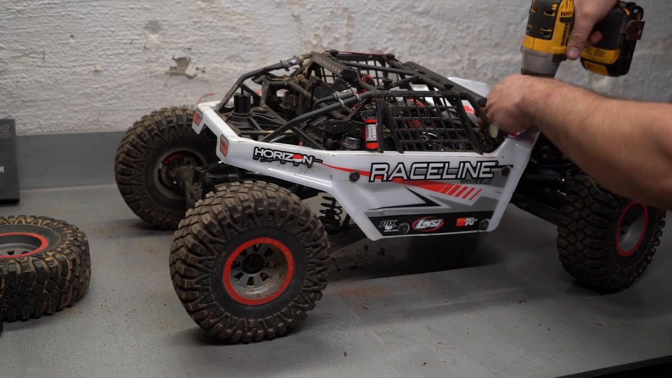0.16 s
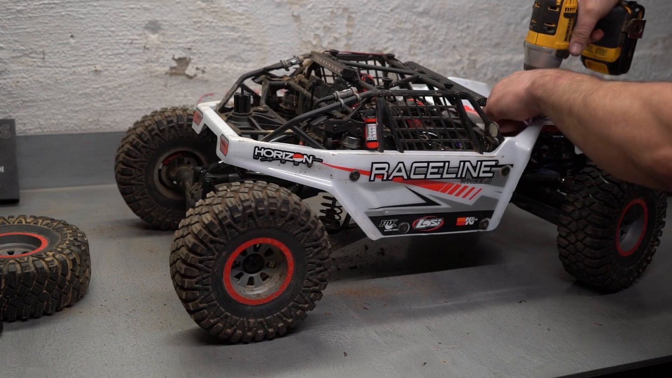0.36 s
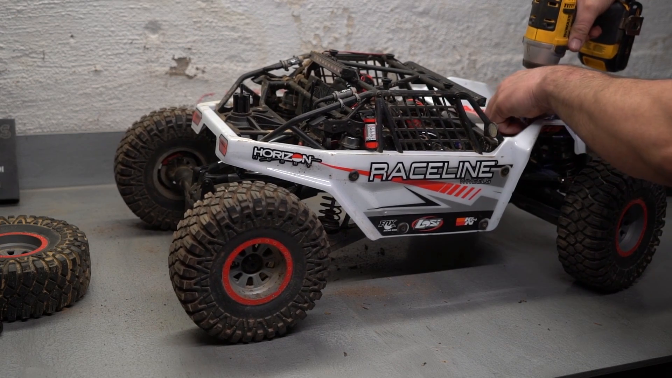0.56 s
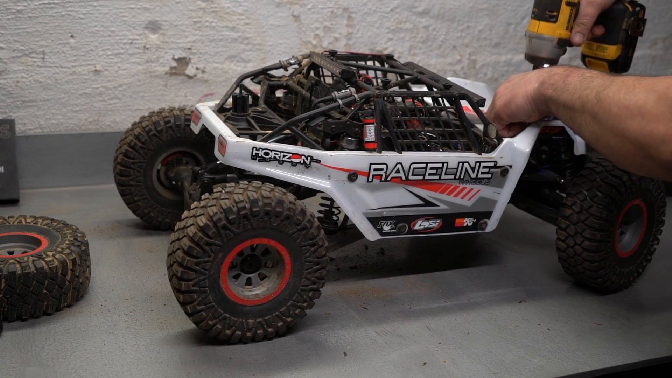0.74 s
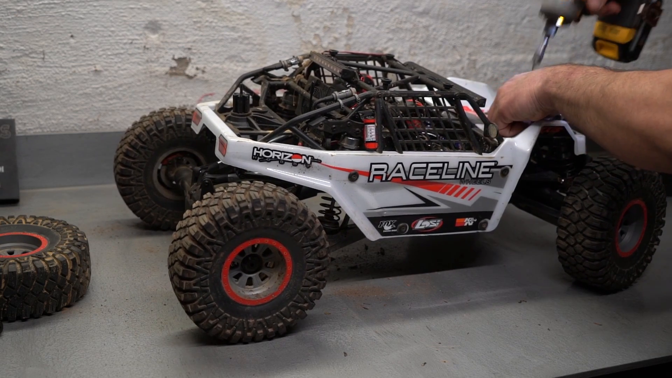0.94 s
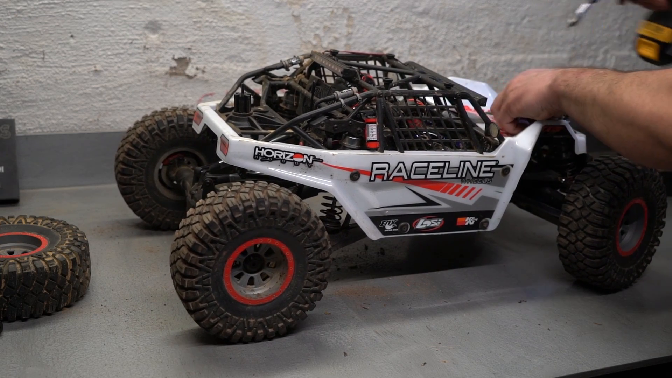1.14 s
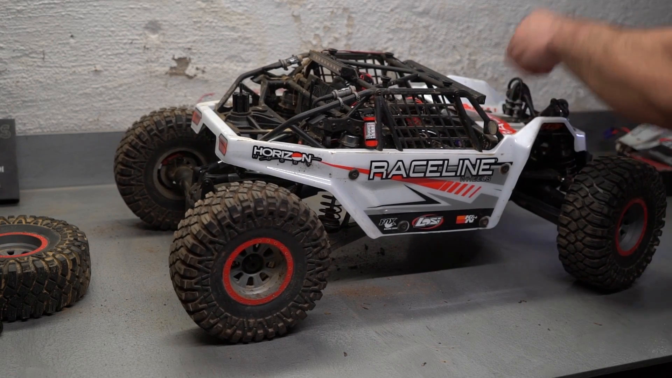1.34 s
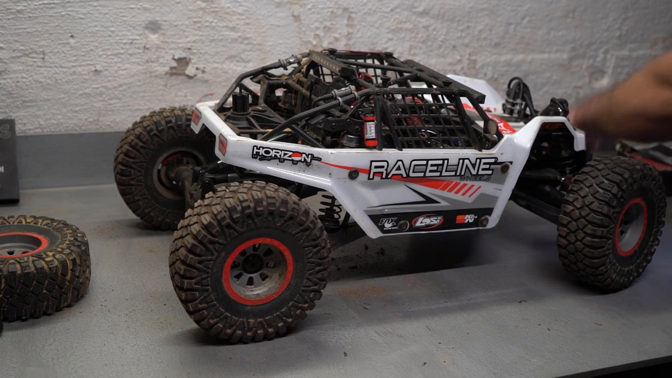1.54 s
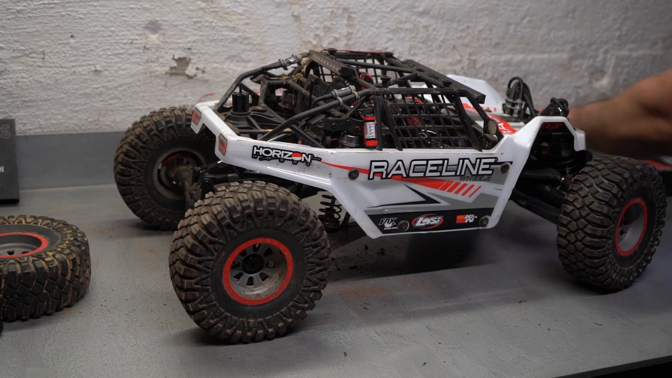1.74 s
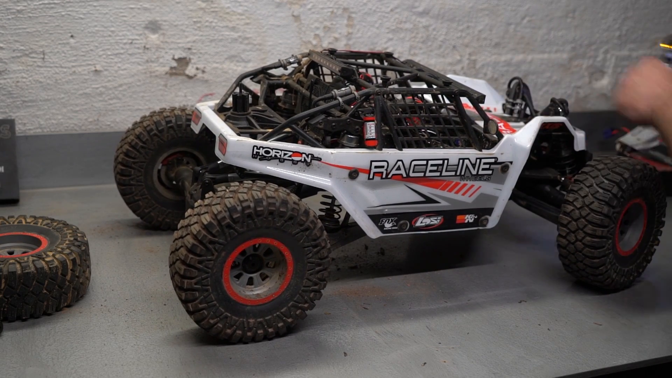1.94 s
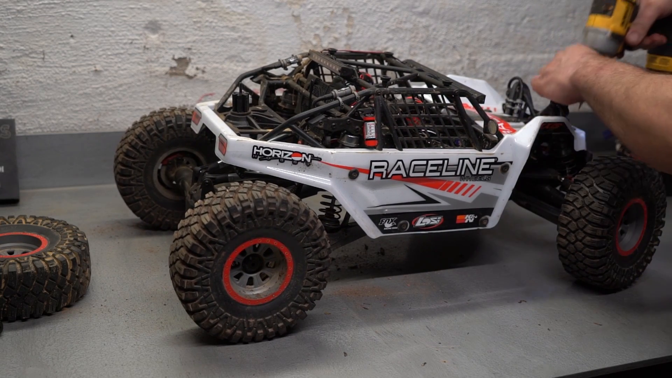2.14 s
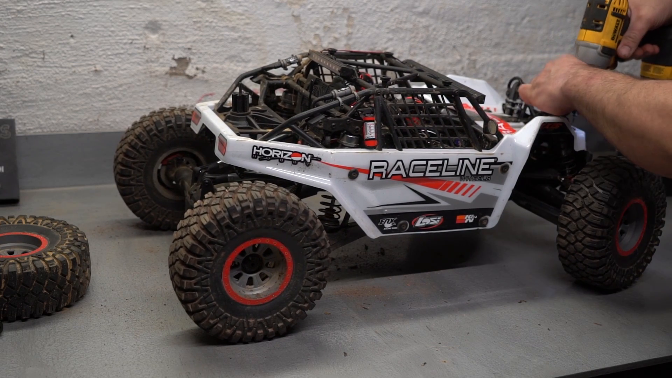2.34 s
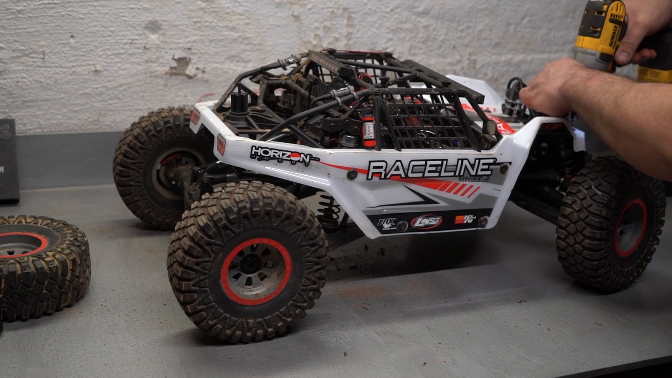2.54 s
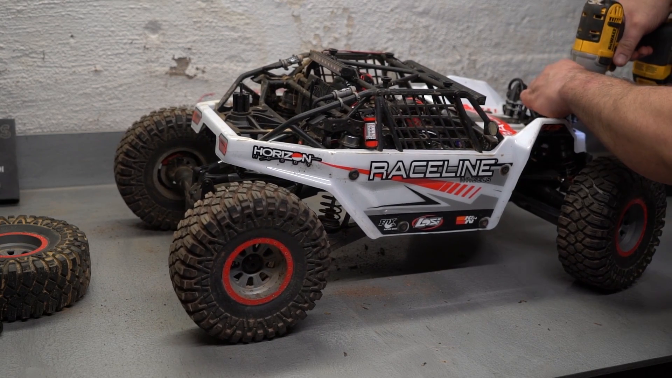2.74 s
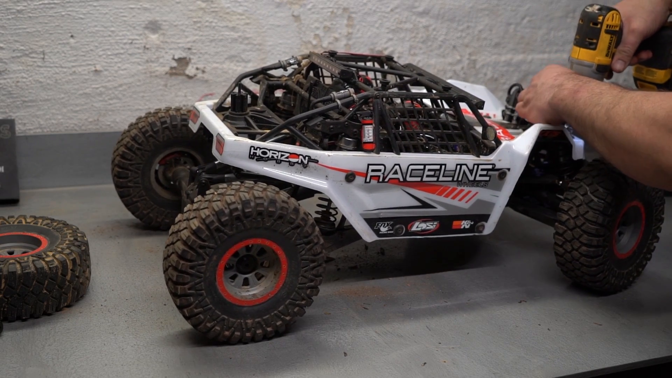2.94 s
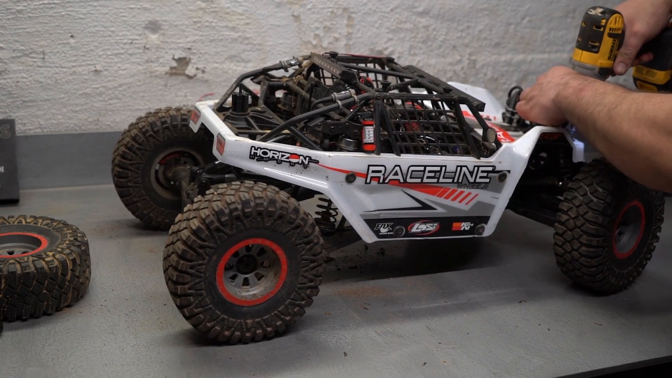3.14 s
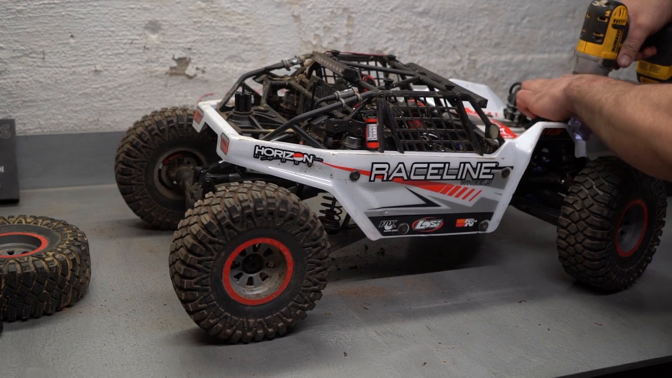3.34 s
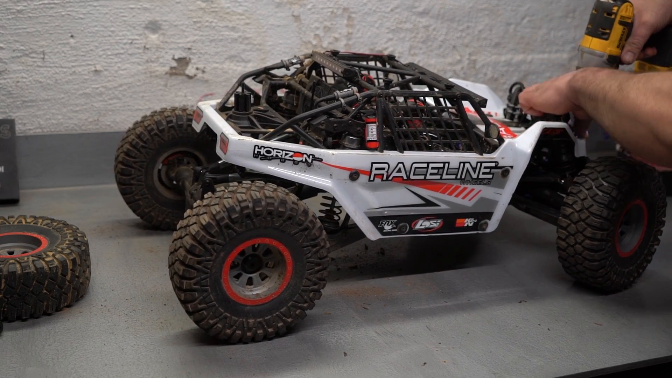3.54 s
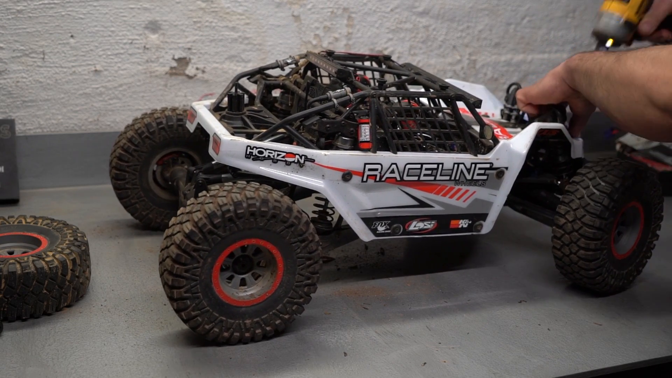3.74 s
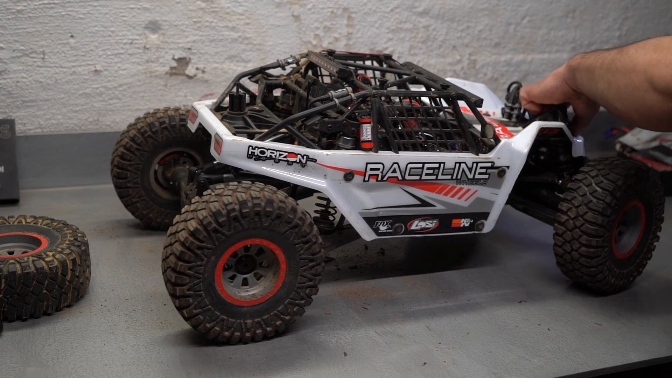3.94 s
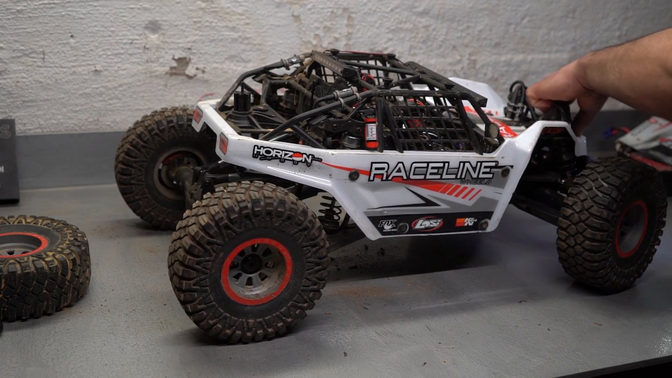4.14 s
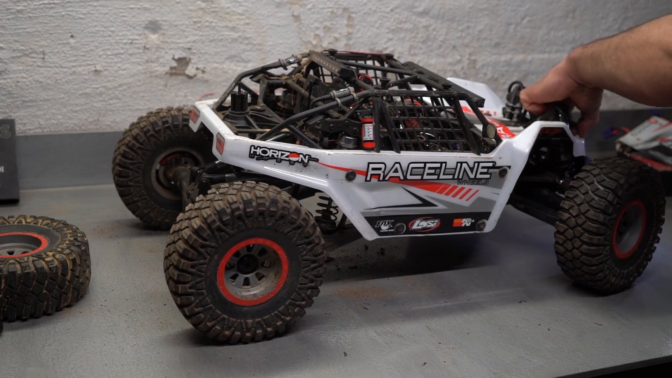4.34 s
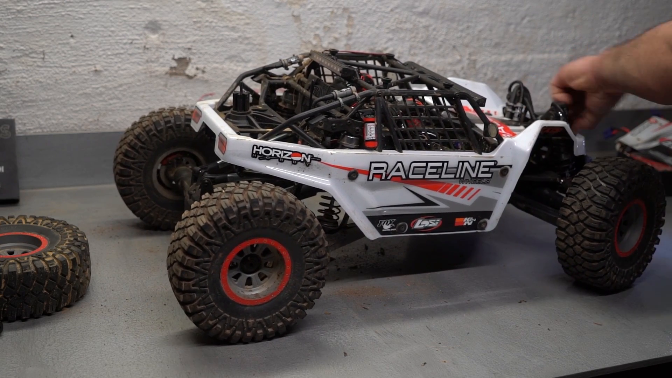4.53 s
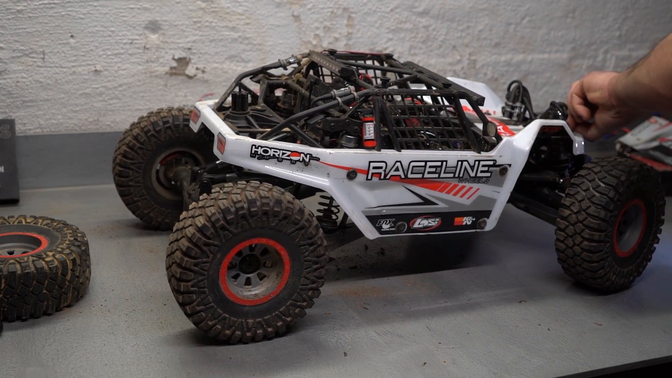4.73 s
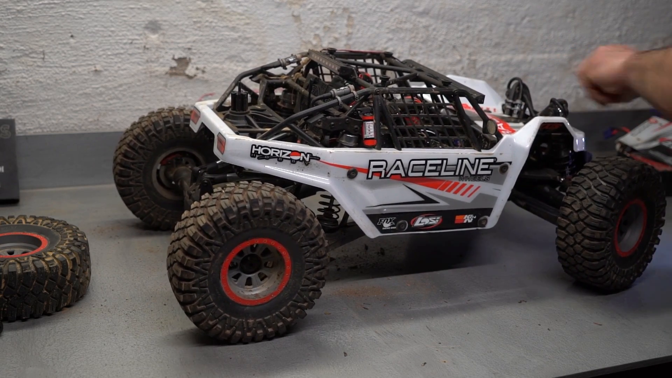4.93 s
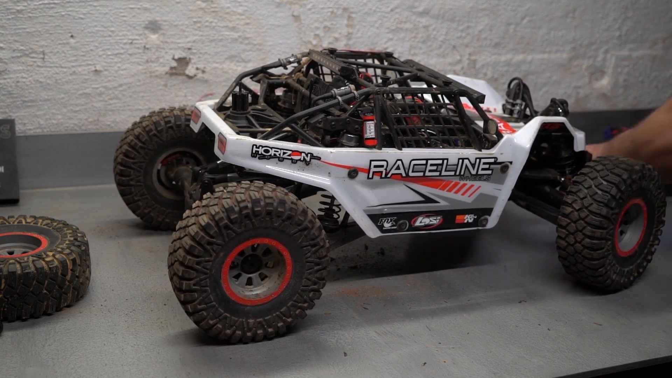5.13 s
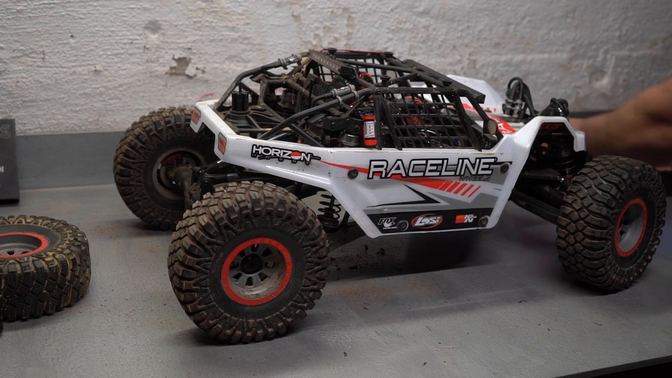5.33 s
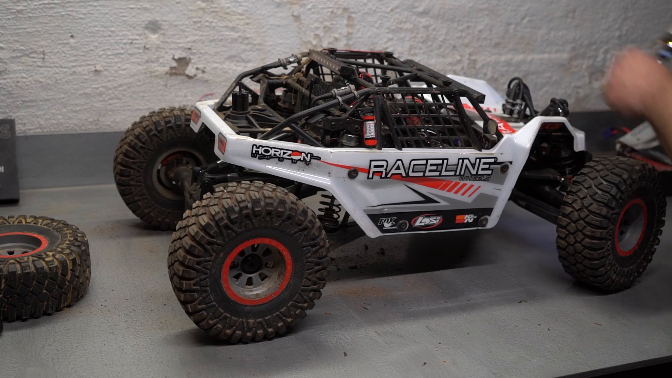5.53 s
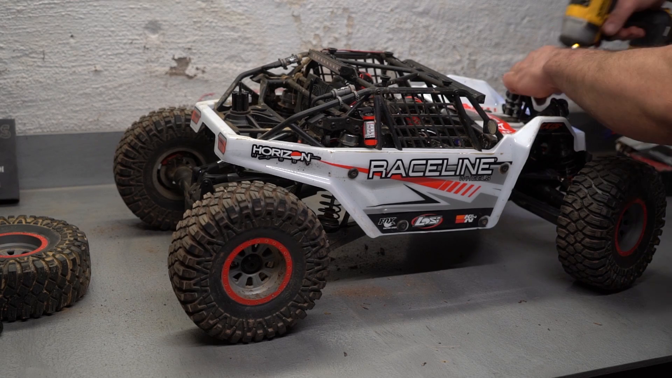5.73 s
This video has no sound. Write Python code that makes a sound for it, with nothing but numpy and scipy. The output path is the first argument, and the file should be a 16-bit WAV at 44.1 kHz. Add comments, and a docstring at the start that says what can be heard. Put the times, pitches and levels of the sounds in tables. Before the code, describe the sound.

In a small workshop with a quiet fan and hum, a close stereo microphone catches a cordless driver already running, slowing to a knock. Hands bump and rub a plastic model car, a screw skids in a tray, then a brief nudge and a faster, brighter driver burst follow. Scuffs, knocks and another skidding screw finish it.

```python
"""A small workshop, two microphones near the bench: direct sound and quick reflections outweigh the tail.
Behind lie room air, a wavering fan, and a hum that steps up in pitch as its rumble stops.
Close by, hands rub, knock and bump a large model car's plastic body; screws skid and tap in a tray:
flurries of tiny contacts and clicks set resonant modes ringing. In front, a cordless impact driver backs
out two small screws: dense gear contacts, tones tied to motor speed, drive whine and ringing hammer blows."""
import sys
import numpy as np
from scipy import signal
from scipy.fft import rfft, irfft, next_fast_len
from scipy.io import wavfile
from scipy.ndimage import uniform_filter1d

SR = 44100
rng = np.random.default_rng(int(sys.argv[2]) if len(sys.argv) > 2 else 0)


def unload_audio(sound):
    """Save the sound as a 16-bit wav file, at the path given as the first command line argument."""
    columns = np.transpose(np.atleast_2d(sound))
    # keep every value between -1 and 1, then stretch to whole-number steps
    steps = np.round(np.clip(columns, -1, 1) * 32767)
    wavfile.write(sys.argv[1], SR, steps.astype(np.int16))


N = 259308
TIME = np.arange(N) / SR  # s


def from_db(db):
    """Decibels to gain."""
    return 10 ** (np.asarray(db) / 20)


def rms_one(x):
    """Scale to unit power."""
    return x / np.sqrt(np.mean(x ** 2) + 1e-20)


def at_hz(points, hz):
    """Read a table on a log-frequency axis."""
    f, value = np.transpose(points)
    return np.interp(np.log(hz + 1e-3), np.log(f), value)


def coloured(x, spectrum):
    """Give a steady sound a spectrum that falls away steeply below its first point; rms 1."""
    size = next_fast_len(N)
    hz = np.arange(size // 2 + 1) * SR / size
    bass_fall = np.minimum(hz / spectrum[0][0], 1) ** 4
    gain = from_db(at_hz(spectrum, hz)) * bass_fall
    return rms_one(irfft(rfft(x, size) * gain, size)[:N])


def passed(x, hz, kind, order=2):
    """Causal Butterworth filter."""
    sections = signal.butter(order, np.clip(hz, 10, .45 * SR), kind, fs=SR, output="sos")
    return signal.sosfilt(sections, x + 1e-18)


def drift(rate):
    """Slow random wander of rms 1, with two random knots per cycle of the rate in Hz."""
    knots = rng.standard_normal(int(N / SR * rate * 2) + 2)
    return rms_one(np.interp(TIME * rate * 2, np.arange(len(knots)), knots))


def gate(start, end):
    """One between two moments, zero outside, with soft edges."""
    inside = (TIME >= start) & (TIME <= end)
    return uniform_filter1d(1. * inside, size=512)


def ring(clicks, hz, t60):
    """A mode: a unit click sets a sine of height 1 ringing, 60 dB down after t60 seconds."""
    r = from_db(-60 / (t60 * SR))  # decay per sample
    w = 2 * np.pi * hz / SR
    return signal.lfilter([0, np.sin(w)], [1, -2 * r * np.cos(w), r * r], clicks + 1e-18)


def click(s, db):
    """One impulse."""
    return from_db(db) * (np.arange(N) == round(s * SR))


def grains(per_s, spread_db):
    """Tiny contacts at random moments, of uneven size; rms 1."""
    sizes = rng.choice([-1, 1], N) * from_db(spread_db * np.minimum(rng.exponential(1, N), 4))
    return rms_one(sizes * (rng.random(N) < per_s / SR))


# spread of diffuse sound across the two microphones: hz, side_over_mid_db
WIDTH = [(60, -32), (250, -13.5), (500, -11.5), (1000, -6.5), (2000, -2.5), (4000, -0.5), (8000, 1.5),
         (16000, 1)]


def diffuse(size):
    """Noise from all around: alike at both microphones in the bass, unrelated in the treble."""
    mid, side = rfft(rng.standard_normal((2, size)))
    width = from_db(at_hz(WIDTH, np.arange(len(mid)) * SR / size))
    return irfft((mid + side * width * [[1], [-1]]) / np.sqrt(1 + width ** 2), size)


# reverberation time of the workshop: hz, t60_s
ROOM_T60 = [(200, 1), (530, 0.7), (1400, 0.49), (3700, 0.34), (10000, 0.28), (16000, 0.18)]


def workshop(x, direct_db, early_db, late_db, early_t60=0.086):
    """Direct sound, quick reflections off bench and wall, then a tail that dies faster in the treble."""
    age, response = TIME[:SR // 2], 0
    edges = np.geomspace(60, 19000, 9)
    after_direct = age > .0012
    for lo, hi in zip(edges, edges[1:]):
        late_t60 = at_hz(ROOM_T60, np.sqrt(lo * hi))
        early = from_db(-60 * age / early_t60) * after_direct
        late = from_db(-60 * age / late_t60) * after_direct
        early_part = from_db(early_db) * early / np.linalg.norm(early)
        late_part = from_db(late_db) * late / np.linalg.norm(late)
        fading = np.hypot(early_part, late_part)
        response = response + passed(diffuse(len(age)), [lo, hi], "band") * fading
    return from_db(direct_db) * x + signal.fftconvolve(x[None], response, axes=1)[:, :N]


# colour of the room air: hz, density_db (per Hz, relative)
AIR = [(15, -49), (25, -15), (59, -17.5), (89, -5), (180, -12.5), (394, -19), (531, -19), (575, -18.5),
       (695, -16), (775, -26.5), (1230, -21), (2000, -25.5), (2610, -25.5), (2990, -26.5), (16000, -32)]
AIR_DB = -56.5


def room_air():
    """Diffuse noise with the colour of the room."""
    return from_db(AIR_DB) * np.array([coloured(side, AIR) for side in diffuse(next_fast_len(N))])


# tones of the fan: pitch_hz, level_db (centre of the wavering, rms)
FAN = [(91.5, -79.5), (177.6, -69.5), (446.8, -72.5), (1249, -74.5)]


def fan():
    """Steady fan tones, each wavering slightly in pitch and level."""
    tones = 0
    for hz, db in FAN:
        phase = 2 * np.pi * np.cumsum(hz + 1.36 * drift(6.6)) / SR
        tones = tones + from_db(db + 1.5 * drift(2.4)) * np.sin(phase)
    return np.sqrt(2) * tones


# colour of the rumble under the first hum: hz, density_db (per Hz, relative)
RUMBLE = [(25, -21), (60, 13), (120, -6), (400, -25), (3000, -60)]
RUMBLE_DB = -63.5
HUM_STEP_S = 1.255
# the hum before and after its step: pitch_hz, level_db
HUM_BEFORE = (361, -58)
HUM_AFTER = (540, -59.5)


def stepping_hum():
    """A slightly unsteady hum steps up in pitch, and its rumble stops."""
    before = gate(0, HUM_STEP_S)
    hum_hz, hum_db = np.outer(HUM_BEFORE, before) + np.outer(HUM_AFTER, 1 - before)
    phase = 2 * np.pi * np.cumsum(hum_hz + 1.08 * drift(11)) / SR
    hum = from_db(hum_db + 0.47 * drift(3.3)) * np.sin(phase)
    rumble = from_db(RUMBLE_DB) * before * coloured(rng.standard_normal(N), RUMBLE)
    return np.sqrt(2) * hum + rumble


def background():
    """Room air, the fan's wavering tones, and a hum with its rumble."""
    return room_air() + fan() + stepping_hum()


# strokes of the hands over the body: middle_s, half_length_s, level_db (relative)
STROKES = [(1.16, 0.3, -49.5), (2.807, 0.069, -63), (4.0, 0.13, -64), (4.57, 0.15, -53),
           (5.21, 0.064, -54.5), (5.7, 0.18, -60.5)]
# colour of skin on plastic: hz, density_db (per Hz, relative)
RUB_COLOUR = [(150, -24.5), (400, 4.5), (750, -0.5), (1400, -5), (3000, -4.5), (6000, -11), (16000, -21)]
HOLD_DB = -63.5  # a resting hand still rubs a little; relative like the strokes


def rubbing():
    """Skin drags over plastic in fine slips; each stroke swells and fades."""
    strokes = sum(from_db(db) * np.exp(-((TIME - s) / half) ** 2) for s, half, db in STROKES)
    pressure = from_db(HOLD_DB) + strokes
    unevenness = from_db(2 * drift(18) - 3.5)
    return pressure * unevenness * coloured(grains(3000, 4.2), RUB_COLOUR)


# bumps against the body: start_s, level_db (relative), push_hz (where the push is strongest)
BUMPS = [(0.891, 0.5, 630), (1.018, -16.5, 600), (4.634, -6, 2600)]
BUMP_FOCUS_DB = 3  # loss one octave away from push_hz, growing with the square of the distance
# the body's big panels: pitch_hz, level_db (relative), t60_s
PANELS = [(239.6, -34.5, 0.65), (777, -21, 0.047), (1302, -25.5, 0.088)]
SETTLE_S = 4.905
# modes as the car settles once on its tyres: pitch_hz, level_db (relative), t60_s
TYRES = [(95, -43.5, 0.65), (150, -48, 0.3), (329, -46.5, 0.17)]


def bumps():
    """Each bump rings the panels, most of all near the pitch of the push; the tyres give a low thud."""
    sound = 0
    for hz, mode_db, t60 in PANELS:
        pushes = sum(click(s, db + mode_db - BUMP_FOCUS_DB * np.log2(hz / push_hz) ** 2)
                     for s, db, push_hz in BUMPS)
        sound = sound + ring(pushes, hz, t60)
    return sound + sum(ring(click(SETTLE_S, db), hz, t60) for hz, db, t60 in TYRES)


def contacts(events, modes, bass_db, mid_db, treble_db, thinning, rise_s, fade_s, edges_hz, ring_db,
             grain_db=1.24):
    """Each touch is a dying flurry of tiny contacts that sets the object's modes ringing."""
    force, age = np.zeros((3, N)), TIME[:SR // 4]
    flurry = (1 - np.exp(-age / rise_s)) * np.exp(-age / fade_s)
    for s, db, hardness in events:
        at = round(s * SR)
        # bass, middle and treble: a hard touch gains treble and loses bass
        band_gains = from_db([[db - thinning * hardness], [db], [db + hardness]])
        force[:, at:at + len(age)] += band_gains * flurry[:N - at] / flurry.max()
    sound = 0
    for f, lo, hi, db in zip(force, edges_hz, edges_hz[1:], (bass_db, mid_db, treble_db)):
        band = passed(f * grains(14000, grain_db), [lo, hi], "band", order=3)
        sound = sound + band * from_db(db) * np.sqrt(SR / 2 / (hi - lo))  # level evened for band width
    ringing = 0
    for hz, db, t60 in modes:
        build_up = np.log(1e6) / (t60 * SR)  # keeps long modes from piling up
        ringing = ringing + from_db(db + ring_db) * build_up * ring(sound, hz, t60)
    return sound + ringing


# screws skidding across the tray: start_s, level_db (relative), hardness_db, gap_s (between skids)
SLIDES = [(1.7468, -30, -2, 0.039), (5.3425, -33.5, 0.5, 0.0337)]
SKID_LOSS_DB, SKID_HARDENING_DB = 5, 1.5  # each further skid is weaker and harder


def skids(count=5):
    """A dropped screw skids a few times before it lies still: start_s, level_db, hardness_db."""
    return [(s + k * gap, db - k * SKID_LOSS_DB, hardness + k * SKID_HARDENING_DB)
            for s, db, hardness, gap in SLIDES for k in range(count)]


# screws and tool set down or picked up: start_s, level_db (relative), hardness_db
TAPS = [(1.9724, -27, -3.5), (5.5433, -27.5, -4.5), (5.5664, -33.5, 5), (5.5837, -31, 1.5),
        (5.8337, -40.5, -5)]
# modes of the tray: pitch_hz, level_db (relative), t60_s
TRAY = [(1720, -14, 0.21), (2120, -8.5, 0.2), (2700, -7, 0.091)]


def tray():
    """Skidding screws and short taps ring the tray."""
    slides = contacts(skids(), TRAY, bass_db=-21, mid_db=-7.5, treble_db=-3.0, thinning=0.37,
                      rise_s=0.0029, fade_s=0.032, edges_hz=(600, 1400, 3900, 15000), ring_db=18,
                      grain_db=2.0)
    taps = contacts(TAPS, TRAY, bass_db=-17, mid_db=-3, treble_db=-5.0, thinning=1.27,
                    rise_s=0.0014, fade_s=0.0061, edges_hz=(390, 1500, 4500, 16000), ring_db=-9)
    return slides + taps


# knocks on the chassis, and the click of the driver's trigger at 3.085 s: start_s, level_db (relative),
# hardness_db
KNOCKS = [(0.622, -24, 0), (0.889, -19, -13.5), (1.3868, -40.5, -2), (2.4834, -28, -5.5),
          (2.591, -37, -12.5), (2.6529, -36, -16), (2.7792, -29.5, -6), (2.8248, -29.5, -3),
          (2.859, -21, 1.5), (2.9629, -32, -11), (3.085, -34, 1.5), (3.978, -20.5, -2), (4.368, -35, 1),
          (4.594, -40, -2), (4.6348, -33, -16), (4.674, -44, 2.5), (4.797, -40.5, 4), (4.8947, -32, -19)]
# fingers and bit scuffing the shell: start_s, level_db (relative)
SCUFFS = [(0.744, -41), (.79, -41.5), (1.088, -49), (4.055, -43), (4.182, -44), (4.245, -54.5),
          (4.384, -43.5), (4.456, -42), (4.545, -47.5), (4.817, -46)]
# modes of the plastic shell and cage: pitch_hz, level_db (relative), t60_s
CHASSIS = [(365.5, 10, 0.15), (458, 1, 0.11), (679.3, 1, 0.059), (782, -3, 0.057), (1060, -28, 0.12),
           (1386, 6, 0.035), (1926, 6.5, 0.043), (2316, 4.5, 0.049), (4680, 3, 0.024), (6840, 4, 0.015)]


def chassis():
    """Sharp knocks and slower scuffs ring the plastic shell."""
    knocks = contacts(KNOCKS, CHASSIS, bass_db=-9.5, mid_db=-2.0, treble_db=0.5, thinning=0.32,
                      rise_s=0.0011, fade_s=0.0045, edges_hz=(360, 1000, 3500, 13500), ring_db=-3.5)
    scuff_events = [(s, db, 0) for s, db in SCUFFS]
    scuffs = contacts(scuff_events, CHASSIS, bass_db=-15.5, mid_db=-5.0, treble_db=-5.0, thinning=0,
                      rise_s=0.023, fade_s=.015, edges_hz=(400, 1000, 3700, 12600), ring_db=1.5)
    return knocks + scuffs


def handling():
    """Chassis and rubbing hands, bumps of the whole car, and the tray, each with its own room balance."""
    return (workshop(chassis() + rubbing(), direct_db=-5.0, early_db=-4.5, late_db=-6)
            + workshop(bumps(), direct_db=-1.5, early_db=-5.5, late_db=-6.5)
            + workshop(tray(), direct_db=-4.5, early_db=-4.0, late_db=-6.5))


SPIN_UP_S, COAST_S = .024, .29  # time to half speed; time constant of coasting
EASE_S, EASE_POWER = .71, 1.8  # an easing finger would stop the motor in this time, ever faster
ATTACK_S = 0.016  # the sound builds as the gears take the load
EASE_LOSS_DB, EASE_DULLING_DB = 19, 8  # level and treble share lost over the trigger's whole travel
COAST_DULLING_DB_PER_S = 150


def motor(on, eases, off, top_speed, db, treble_db, run_down_db_per_s):
    """The motor spins up, sags as the finger eases, then coasts: turns per s, loudness, treble share."""
    age, coasting = np.maximum(TIME - on, 0), np.clip(TIME - off, 0, 1)
    eased = np.clip((np.minimum(TIME, off) - eases) / EASE_S, 0, 1) ** EASE_POWER
    spin_up = age / (age + SPIN_UP_S)
    speed = top_speed * spin_up * (1 - eased) * np.exp(-coasting / COAST_S)
    attack = (1 - np.exp(-age / ATTACK_S)) ** 2
    loudness = attack * from_db(db - EASE_LOSS_DB * eased - run_down_db_per_s * coasting)
    share = from_db(treble_db - EASE_DULLING_DB * eased - COAST_DULLING_DB_PER_S * coasting)
    return speed, loudness, np.clip(share, 0, .95)


def driver_run(run, colour, throb, grain_db, treble_hz=7000):
    """Gear teeth and bit make a dense stream of contacts, bunched once a turn by play in the gears."""
    speed, loudness, share = run
    turns = np.cumsum(speed) / SR
    bunching = 1 + throb * np.cos(2 * np.pi * turns)
    sound = coloured(grains(20000, grain_db) * bunching, colour)
    top = passed(sound, treble_hz, "high", order=4)
    rest = passed(sound, treble_hz, "low", order=4)
    return loudness * (share * rms_one(top) + np.sqrt(1 - share ** 2) * rms_one(rest))


# rattle with the bit in each screw: hz, density_db (per Hz, relative)
FIRST_COLOUR = [(110, -66), (180, -26), (252, -10), (334, -16), (460, -10.5), (610, -17), (855, -5.5),
                (1090, -10.5), (1850, -1.5), (2490, -6), (3180, -5), (3700, -3.5), (9110, -4), (13300, -4),
                (16000, -13)]
SECOND_COLOUR = [(150, -47), (250, -30.5), (436, -3), (484, -13.5), (662, -5), (831, -13.5), (1350, -5.5),
                 (1580, -10), (2620, -0.5), (3840, -6.5), (5440, -5), (6940, -6.5), (7840, -3), (14900, -4),
                 (16000, -25)]


def rattle(first, nudge, second):
    """The contacts of all three runs, coloured by the screw that the bit sits in."""
    return (driver_run(first, FIRST_COLOUR, throb=0.2, grain_db=3.0)
            + driver_run(nudge, SECOND_COLOUR, throb=0.38, grain_db=2.5)
            + driver_run(second, SECOND_COLOUR, throb=0.28, grain_db=3.0))


def gear_tones(run, tones, wobble, flutter_db):
    """Rotor and gear meshes sing at fixed multiples of the slightly uneven motor speed."""
    speed, loudness, _ = run
    turns = np.cumsum(speed * (1 + wobble * drift(50))) / SR
    lines = sum(from_db(db + flutter_db * drift(25)) * np.sin(2 * np.pi * multiple * turns)
                for multiple, db in tones)
    return np.sqrt(2) * loudness * lines


def worn_teeth(db, count=16):
    """Uneven teeth repeat every turn: a faint comb of tones on the upper multiples of the speed."""
    return [(8 + k, db) for k in range(count)]


# rotor and gear tones: speed_multiple, first_run_db, second_run_db (relative to the run's loudness)
ORDERS_DB = [(1, -26, -27), (2, -32, -28), (3.3, -23, -33), (6.125, -19.5, -16), (6.6, -17.5, -32),
             (7, -13.5, -24), (12.25, -15, -13.5), (17, -22, -15)]


def gear_song(first, nudge, second):
    """Tones of rotor, gears and worn teeth that follow the motor speed in each run."""
    orders = np.array(ORDERS_DB)
    second_orders = gear_tones(second, orders[:, ::2], wobble=0.0078, flutter_db=3.0)
    return (gear_tones(first, orders[:, :2], wobble=0.0083, flutter_db=2.5)
            + gear_tones(first, worn_teeth(db=-24.5), wobble=0.0052, flutter_db=4.5)
            + gear_tones(second, worn_teeth(db=-26), wobble=0.0041, flutter_db=4.5)
            + gear_tones(nudge, [(6.125, -7.5)], wobble=0.011, flutter_db=5.0)
            + passed(second_orders, 370, "high", order=4))


# switching whine of the motor drive at part trigger: start_s, end_s, level_db (relative)
WHINES = [(2.808, 2.945, -41), (3.076, 3.15, -40)]
WHINE_HZ = 5890


def drive_whine():
    """The motor drive switches at a fixed pitch, with a weaker octave above and a jittering phase."""
    phase = 2 * np.pi * WHINE_HZ * TIME + .4 * drift(66)
    level = sum(from_db(db) * gate(start, end) for start, end, db in WHINES)
    return level * (np.sin(phase) + from_db(-15) * np.sin(2 * phase))


# hammer blows on the anvil: start_s, level_db (relative)
BLOWS = [(0.621, -15), (0.632, -28), (2.860, -23.5)]
# modes of the steel: pitch_hz, level_db (relative), t60_s
ANVIL = [(910, -31, 0.91), (974.5, -11, 0.12), (2090, -17, 0.17), (3440, 0, 0.045), (3850, -4, 0.049),
         (4350, 3, 0.028), (5384, -13.5, 0.29), (5420, -2, 0.041), (7170, -8, 0.12)]


def hammer():
    """Each blow is one click that rings the modes of the steel anvil."""
    blows = sum(click(s, db) for s, db in BLOWS)
    return sum(from_db(db) * ring(blows, hz, t60) for hz, db, t60 in ANVIL)


# pulls of the trigger: on_s, eases_s (finger starts to ease), off_s, top_speed (turns per s),
# level_db (relative), treble_share_db, run_down_db_per_s
PULLS = [(-0.14, 0.228, 0.65, 280, -19, -5, 220), (2.834, 2.852, 2.968, 145, -30, -5.5, 700),
         (3.092, 3.441, 3.5975, 486, -18.5, -1.93, 334)]


def driver(count=4):
    """A run on the first screw, a nudge and a faster run on the second; drive whine and hammer blows."""
    runs = [motor(*pull) for pull in PULLS]
    # several moving parts each rattle on their own and reach the microphones by their own paths
    rattles = sum(workshop(rattle(*runs), direct_db=-5.5, early_db=-3.0, late_db=-7.5)
                  for part in range(count)) / np.sqrt(count)
    ringing = gear_song(*runs) + drive_whine() + hammer()
    return rattles + workshop(ringing, direct_db=-5.0, early_db=-4.5, late_db=-13)


def scene():
    """The driver is held to the right, so its treble is stronger on that side."""
    tool = driver()
    tilt = 0.1 * passed(tool, 3000, "high", order=1) * [[-1], [1]]
    return background() + handling() + tool + tilt


CUTOFF_HZ = 16000


def record(dry):
    """The top is cut steeply."""
    return signal.sosfilt(signal.ellip(12, .1, 80, CUTOFF_HZ, fs=SR, output="sos"), dry)


dry = scene()
out = record(dry)
unload_audio(out)
```